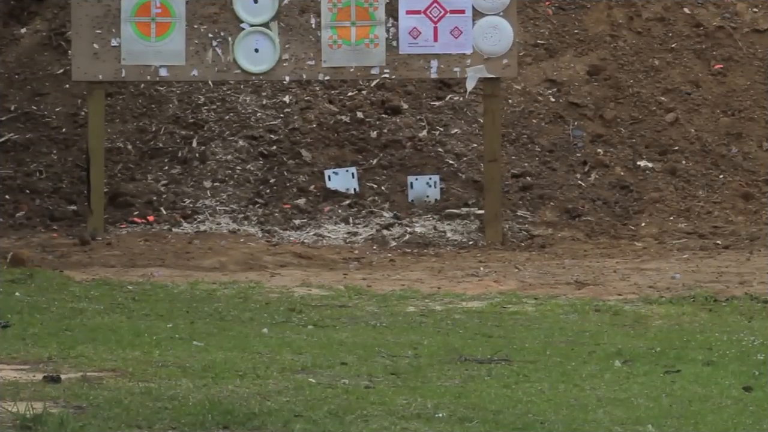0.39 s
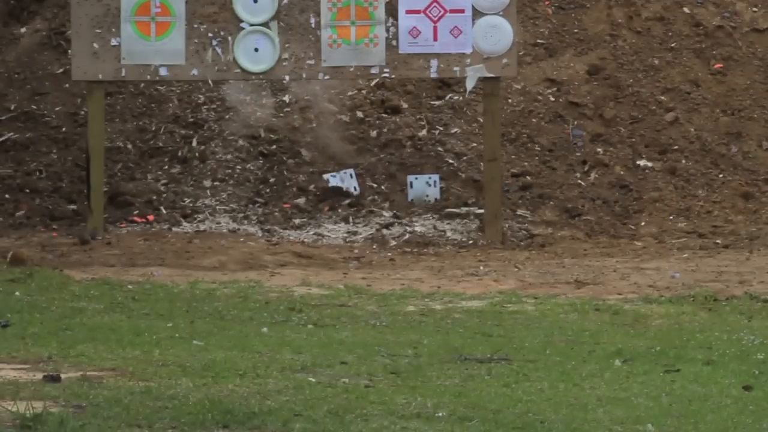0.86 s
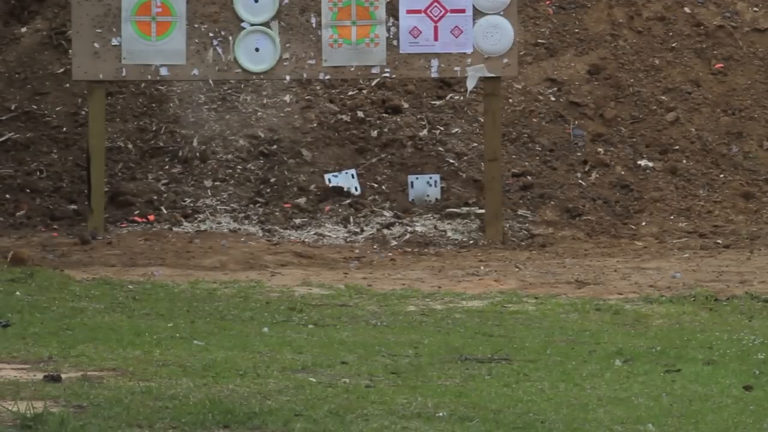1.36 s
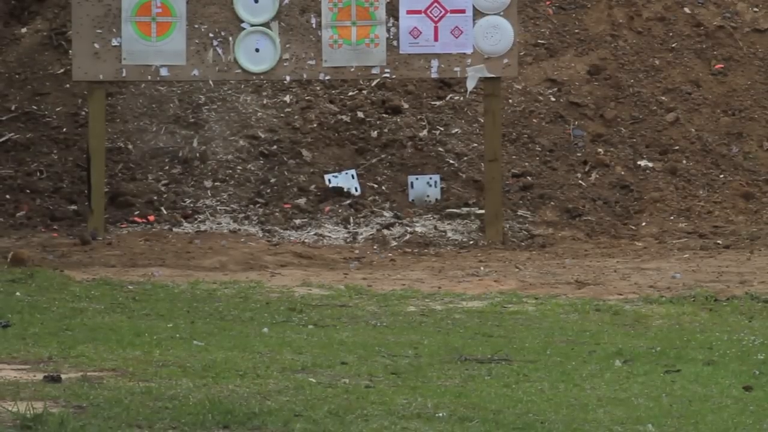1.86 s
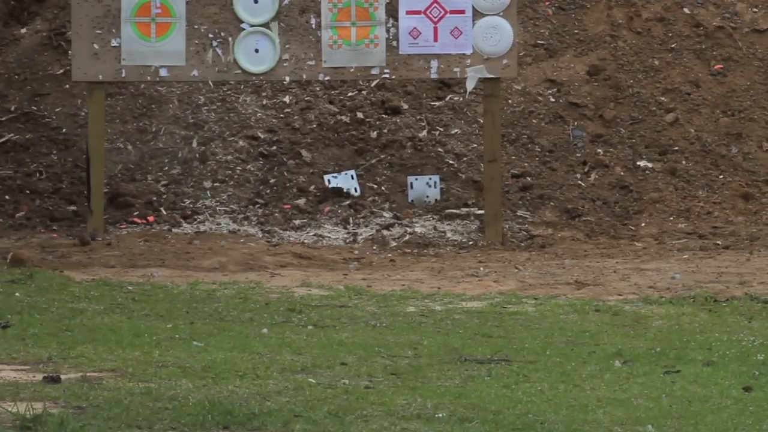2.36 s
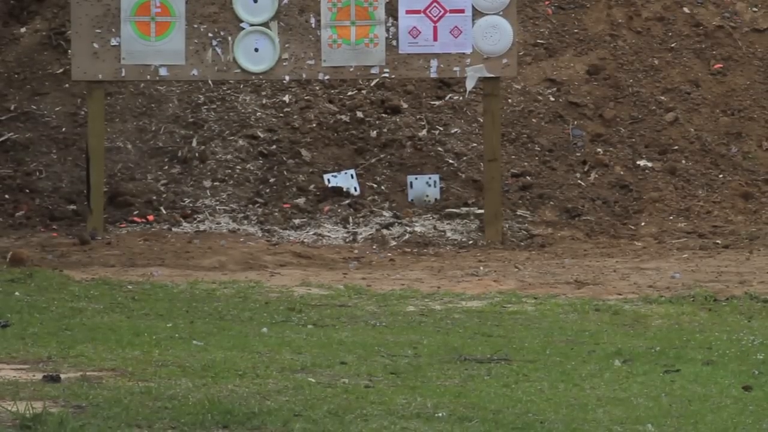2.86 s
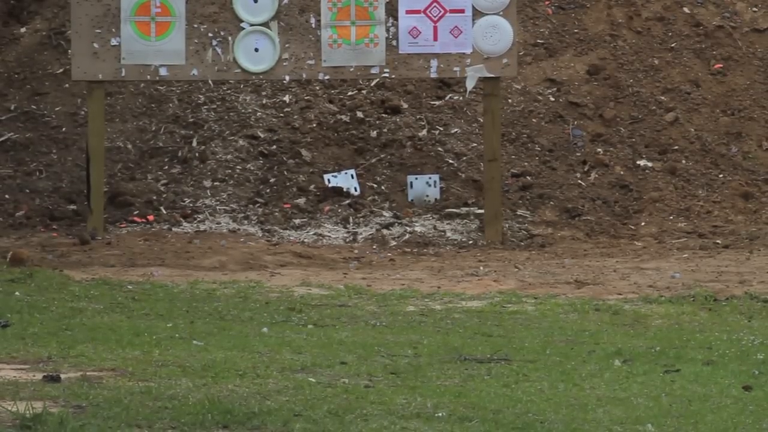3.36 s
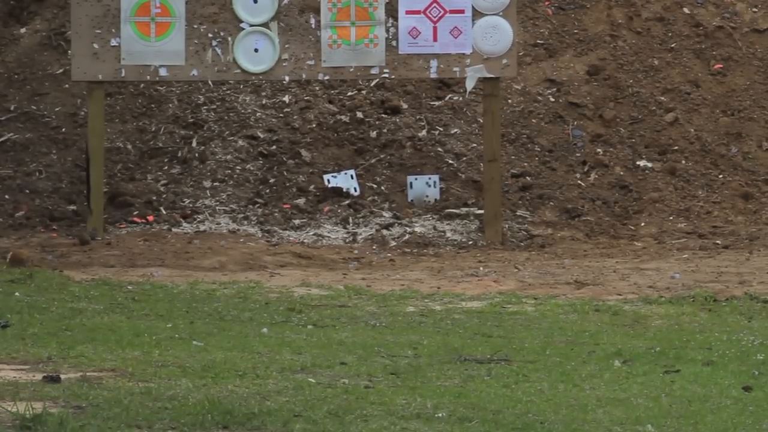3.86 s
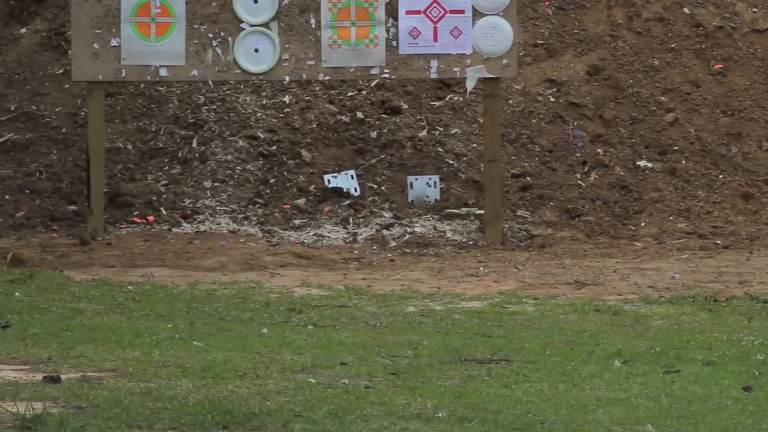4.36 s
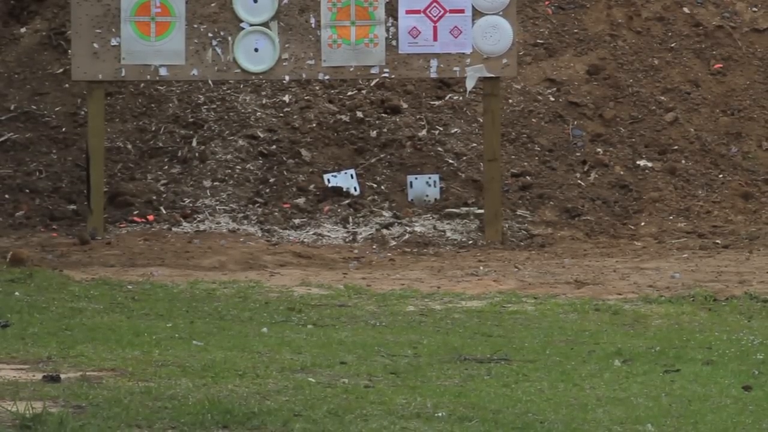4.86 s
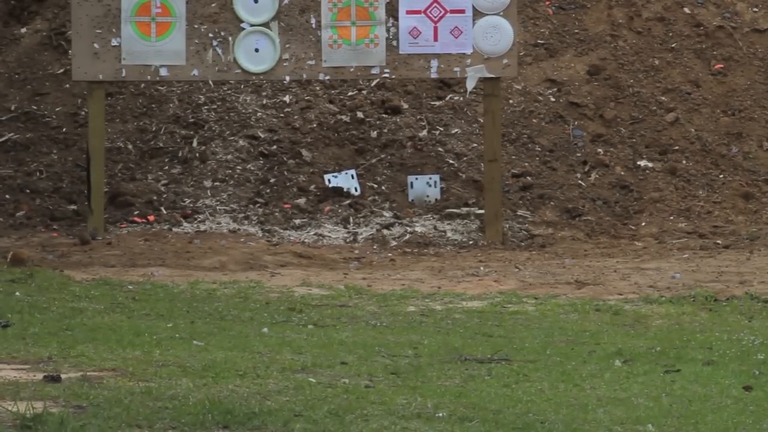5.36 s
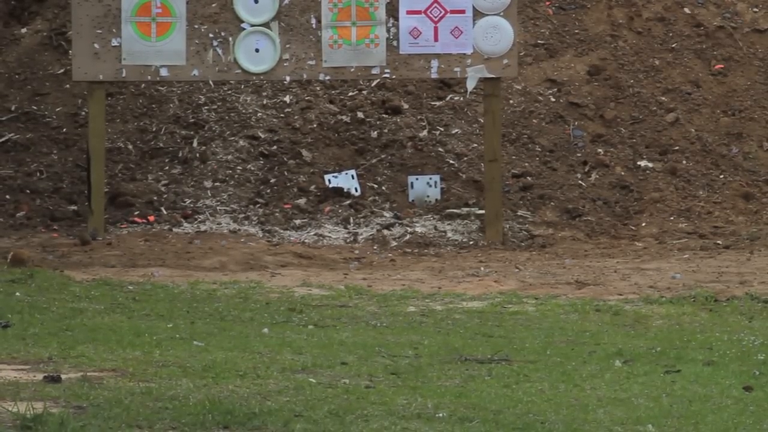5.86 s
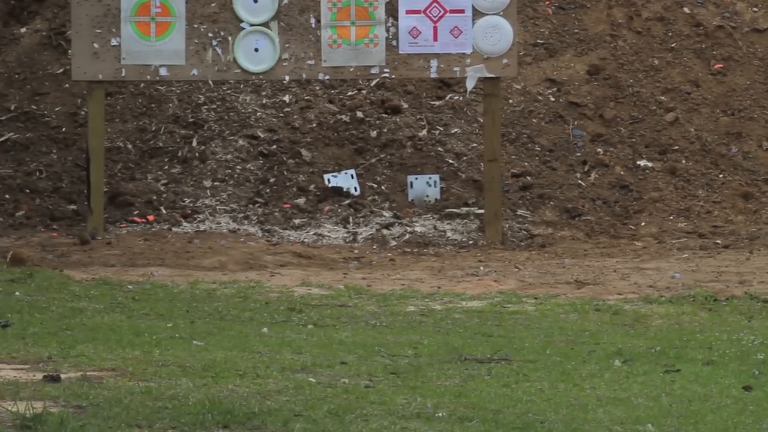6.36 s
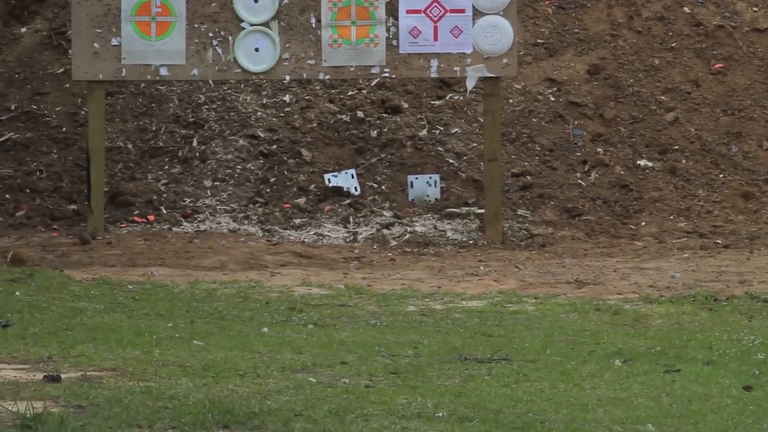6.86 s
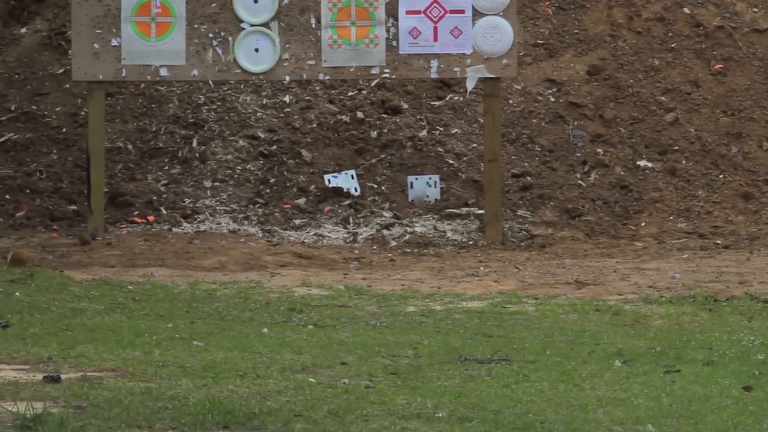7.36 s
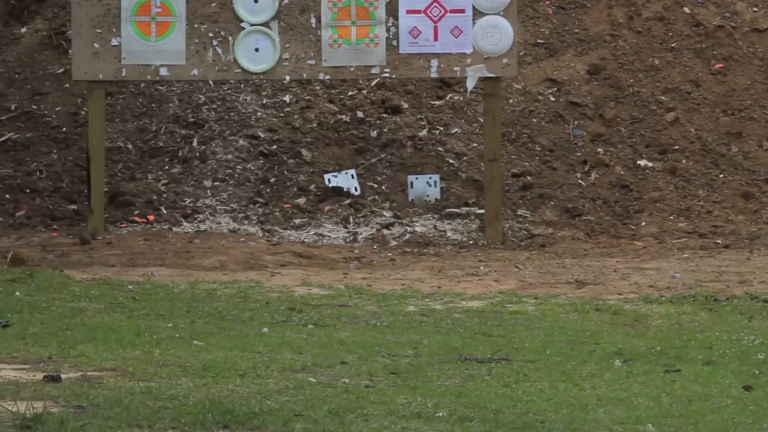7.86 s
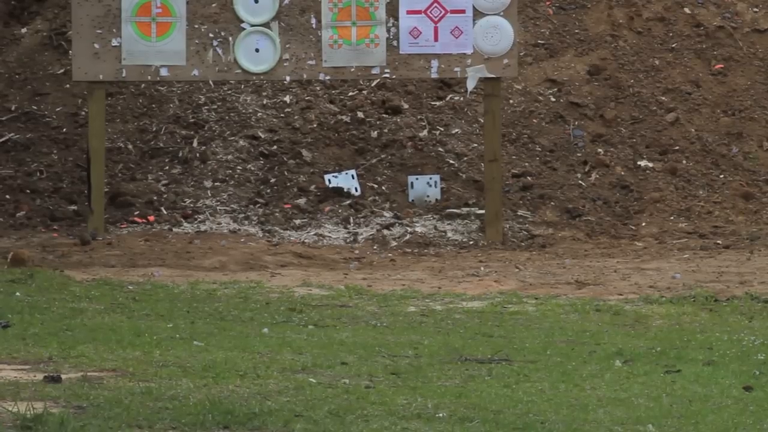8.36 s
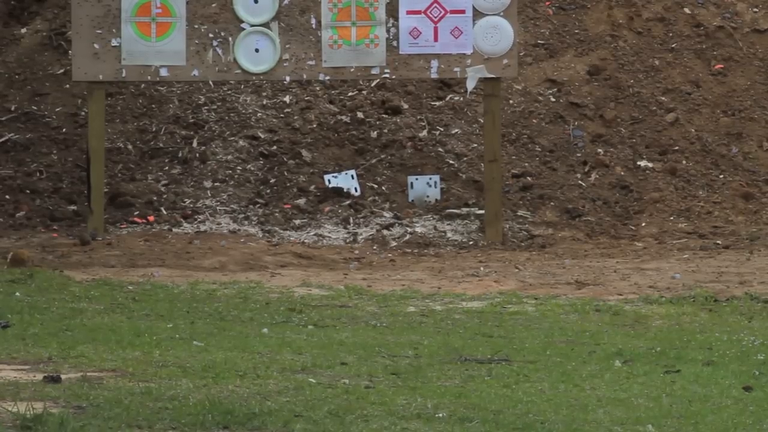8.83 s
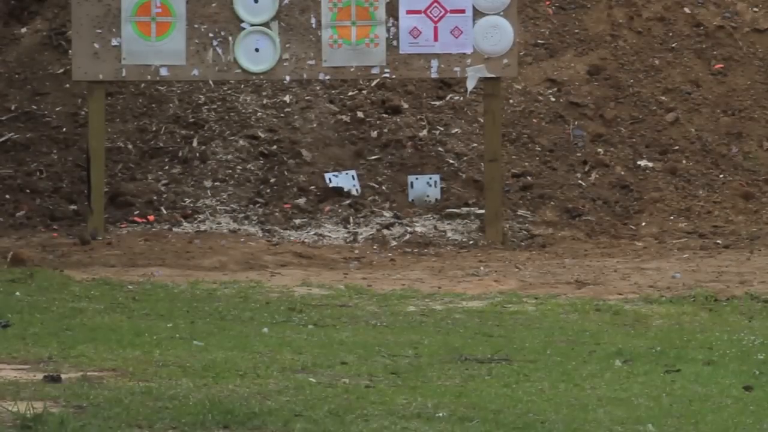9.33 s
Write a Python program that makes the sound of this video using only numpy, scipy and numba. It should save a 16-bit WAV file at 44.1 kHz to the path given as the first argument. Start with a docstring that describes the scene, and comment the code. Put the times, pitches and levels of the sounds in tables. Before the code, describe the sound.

Eight loud gunshots at an outdoor range, six sharp and two heavy, with slapping echoes, rattling steel bolt and brass cases tinkling on concrete.

```python
"""Outdoor range, covered firing line: a light carbine fires six times, a heavy rifle twice, close to a camera.
Each blast is a few steep pressure waves, banded noise decaying under the roof, then slaps and washes between far banks.
A steel bolt rattles and knocks, brass cases ring on concrete, over a hush, a fading rumble and wavering hums.
The microphone input overloads and a gain control ducks the background after every shot."""
import sys
import numpy as np
from scipy import signal
from scipy.fft import rfft, irfft, next_fast_len
from scipy.io import wavfile
from scipy.ndimage import uniform_filter1d, minimum_filter1d
from numba import njit

SR = 44100
rng = np.random.default_rng(int(sys.argv[2]) if len(sys.argv) > 2 else 0)


def pcm_store(signal):
    """Save signal as 16-bit PCM."""
    levels = np.round(np.clip(np.atleast_2d(signal), -1, 1) * 32767)
    wavfile.write(sys.argv[1], SR, levels.astype(np.int16).T)


def ratio_of_db(decibels):
    """Turn decibels (scalar or array-like) into linear amplitude factors; 0 dB maps to 1."""
    return 10 ** (np.asarray(decibels, float) / 20)


N = 417627


def evened(x):
    """Scales to rms 1."""
    return x / np.sqrt(np.mean(x ** 2) + 1e-20)


def read(points, hz):
    """All columns of a table at the frequencies hz, interpolated on a log axis."""
    f, *columns = np.transpose(points)
    return [np.interp(np.log(hz + 1), np.log(f + 1), c) for c in columns]


def add(mix, start_s, sound):
    """Adds a sound in place, cut at the end of the mix."""
    part = mix[round(start_s * SR):][:len(sound)]
    part += sound[:len(part)]


def coloured(size, points, tilt_db_per_octave=0):
    """Noise of rms 1 with a spectrum, tilted about 3 kHz."""
    hz = np.fft.rfftfreq(size, 1 / SR)
    spectrum_db = read(points, hz)[0] + tilt_db_per_octave * np.log2((hz + 1) / 3000)
    return evened(irfft(rfft(rng.standard_normal(size)) * ratio_of_db(spectrum_db), size))


def dying(t, db, t60, rise):
    """Power of a sound that starts at t = 0, swells and decays."""
    t = np.maximum(t, 0)
    return (ratio_of_db(db - 60 * t / t60) * (1 - np.exp(-t / rise))) ** 2


# band centres [Hz]
BANDS = np.geomspace(50, 16000, 16)


def banded(size):
    """White noise split in overlapping bands, each of rms 1."""
    log_hz = np.log(np.fft.rfftfreq(size, 1 / SR) + 1)
    place = np.interp(log_hz, np.log(BANDS), np.arange(len(BANDS)))
    share = np.clip(1 - abs(place - np.arange(len(BANDS))[:, None]), 0, 1)
    bands = irfft(rfft(rng.standard_normal(size)) * share, size)
    return bands / bands.std(1, keepdims=True)


def blast_wave(delay_free_t, length_s):
    """Steep pressure wave, roughened by turbulent gas."""
    u = delay_free_t / length_s
    turbulence = uniform_filter1d(rng.standard_normal(len(u)), size=5)
    crackle = 1 + 1.2 * np.exp(-1.3 * u) * turbulence
    return -(1 - u) * np.exp(-u) * crackle


# return from banks and trees:
# (frequency [Hz], slap level [dB], wash level [dB], t60 of one wash [s], long tail level [dB], its t60 [s])
FAR = [(60, -25, -11, 1, -57.5, 1.6), (302, -45, -35.5, 0.95, -34, 1.14), (790, -36, -20, 0.87, -31, 1.31),
       (1830, -3, -1.5, 0.68, -45, 2.61), (2640, -16, -0.5, 0.16, -20.5, 1.23),
       (4480, -2, -5, 0.47, -43.5, 2.01), (7100, -21, 2.5, 0.17, -30, 1.115),
       (10700, -5.5, -5.5, 0.34, -42.5, 0.52), (15300, -33, -12, 0.36, -49, .8)]
AGAIN_FROM_S, AGAIN_S, AGAIN_DB = .5, .2405, -6.5  # distant returns cross once more between two banks
SLAP_S, SMEAR_S_PER_S = 0.0011, 0.0012  # slap time scale, its growth with path time
WASH_RISE_S = 0.0072
DULL_DB_PER_S, DULL_MOST_DB, WASH_DULL_LEAST_DB = 72.5, 32.5, 2  # loss at 10 kHz, grows with path time


def far_returns(t, echoes, tail_db, tail_tilt_db, clear_s):
    """Band powers of washes with long tail, and of slaps; treble loss grows with the path beyond clear_s."""
    hz = BANDS[:, None]
    slap_colour_db, wash_colour_db, wash_t60, long_db, long_t60 = read(FAR, hz)
    far = dying(t, long_db + tail_db + tail_tilt_db * np.log2(hz / 2000), long_t60, .05)
    slaps = np.zeros_like(far)
    again = [(delay + AGAIN_S, slap_db + AGAIN_DB, wash_db + AGAIN_DB)
             for delay, slap_db, wash_db in echoes if delay > AGAIN_FROM_S]
    for delay, slap_db, wash_db in echoes + again:
        dull_db = min(DULL_DB_PER_S * (delay - clear_s), DULL_MOST_DB)
        start = round(delay * SR)
        span = slice(start, start + 20000)
        after = t[span] - delay
        wash_loss_db = max(dull_db, WASH_DULL_LEAST_DB) * hz / 10000
        far[:, span] += dying(after, wash_db + wash_colour_db - wash_loss_db, wash_t60, WASH_RISE_S)
        # the crack returns as a short burst
        burst = np.exp(-(after / (SLAP_S + SMEAR_S_PER_S * delay) - 1) ** 4 * 2)
        slaps[:, span] += ratio_of_db(2 * (slap_db + slap_colour_db - dull_db * hz / 10000)) * burst
    # reflectors thin out with distance
    scatter = evened(uniform_filter1d(rng.standard_normal(len(t)), 160))
    far *= ratio_of_db(np.clip(9 * t, 2, 5) * scatter)
    return far, slaps


# noise common to all shots of a gun: (time after shot [s], share [0..1])
LIKENESS = [(0, 1), (.05, 1), (.2, 0.54), (1.6, 1)]
SLAP_LOSS_DB_PER_S = 1200  # per s of lag: the further the muzzle turns away, the weaker the slap


def gun(shots, blast, near, echoes, tail_db, tail_tilt_db, knee_s, fall_db_per_s, clear_s):
    """Blast waves, roof reverberation and echoes; the place answers each shot nearly alike."""
    t = np.arange(70000) / SR
    close = dying(t, *read(near, BANDS[:, None]))
    close = close / ratio_of_db(2 * fall_db_per_s * np.maximum(t - knee_s, 0))  # decay bends at the knee
    far, slaps = far_returns(t, echoes, tail_db, tail_tilt_db, clear_s)
    place = banded(len(t))
    same = np.clip(np.interp(t, *np.transpose(LIKENESS)), 0, 1)
    out = np.zeros(N)
    for start_s, blast_db, echo_db, lag_s in shots:
        turned_slaps = slaps / ratio_of_db(2 * SLAP_LOSS_DB_PER_S * lag_s)
        late = ratio_of_db(2 * echo_db) * np.roll(far + turned_slaps, round(lag_s * SR), axis=1)
        noise = same * place + np.sqrt(1 - same ** 2) * banded(len(t))
        shot = (noise * np.sqrt(close + late)).sum(0)
        for delay_s, wave_db, length_s in blast:
            add(shot, delay_s, ratio_of_db(wave_db) * blast_wave(t[:1000], length_s))
        add(out, start_s, ratio_of_db(blast_db) * shot)
    return out


# (time [s], gain of the whole shot [dB], further echo gain [dB], echo lag as the muzzle turns away [s])
CARBINE_SHOTS = [(0.8358, 2.5, -4.5, 0.002), (2.3853, 0.5, 0.3, 0.0028), (3.6940, 1, 0.7, 0.0011),
                 (5.4004, 2, 0.5, 0.0001), (6.7903, 1, 0, 0.002), (8.1234, 0.5, -0.1, 0.003)]
# pressure wave, bounces off bench and ground: (delay [s], level [dB], length [s])
CARBINE_BLAST = [(0, 19, .00028), (.0005, 24, .0004), (.0021, 13, .0008), (.0036, 18, .0005),
                 (.0049, 12, .00015), (.0058, 10, .0005)]
# reverberation under the roof: (frequency [Hz], level [dB], t60 [s], rise [s])
CARBINE_NEAR = [(59.7, -40, 0.7, .01), (185, -16, 0.42, 0.0069), (480, -14.5, 0.5, 0.0021),
                (845, -16, 0.38, 0.0019), (1544, -12.5, 0.53, 0.0025), (2260, -7.5, 0.49, 0.0015),
                (4570, -10, 0.55, 0.0017), (6960, -10.5, 0.39, 0.0025), (11000, -9.5, 0.43, 0.0055),
                (15500, -12.5, .4, .001)]
# reflectors: (delay [s], slap level [dB], wash level [dB])
CARBINE_ECHOES = [(0.23, -58, -22), (.258, -8.5, -37), (0.513, -18, -37), (0.551, -22.5, -41),
                  (0.675, -29, -47.5), (.704, -35, -48.5), (0.9647, -37.5, -54)]


def carbine():
    """Light gun: several close wave bounces; roof decay slows past the knee."""
    return gun(CARBINE_SHOTS, CARBINE_BLAST, CARBINE_NEAR, CARBINE_ECHOES,
               tail_db=0.0, tail_tilt_db=2.5, knee_s=0.24, fall_db_per_s=-7, clear_s=0.33)


# (time [s], gain of the whole shot [dB], further echo gain [dB], echo lag [s])
RIFLE_SHOTS = [(0.5408, 0.077, .1, .0001), (8.9609, 0.11, 0.14, .0001)]
# pressure wave and bounce: (delay [s], level [dB], length [s])
RIFLE_BLAST = [(0, 26.8, 0.00034), (.0032, 8.9, 0.00033)]
# reverberation under the roof: (frequency [Hz], level [dB], t60 [s], rise [s])
RIFLE_NEAR = [(62, -10.5, 0.93, 0.074), (128, 10.5, 0.63, 0.038), (215, 12.5, 0.51, 0.041),
              (450, 18, 0.58, 0.1), (885, 14.5, 0.63, 0.03), (1620, 8, 0.63, .003),
              (2228, 10.5, 0.66, 0.0039), (4400, 2.5, 0.88, 0.0056), (7000, -0.5, 0.78, 0.00077),
              (11220, -3.5, 0.63, 0.00055), (15500, -9.5, .4, .001)]
# reflectors: (delay [s], slap level [dB], wash level [dB])
RIFLE_ECHOES = [(0.181, 3, -12.5), (0.4364, -10, -18)]


def rifle():
    """Heavy gun: strong low reverberation; past the roof's end it dies faster."""
    return gun(RIFLE_SHOTS, RIFLE_BLAST, RIFLE_NEAR, RIFLE_ECHOES,
               tail_db=9.0, tail_tilt_db=-6.5, knee_s=0.084, fall_db_per_s=16, clear_s=0.19)


# spectrum off a distant slope: (frequency [Hz], density [dB per Hz])
SLOPE_COLOUR = [(59, -44), (100, -12), (290, -3.5), (546, -9), (641, -2.5), (807, -12), (2500, -49.5),
                (3250, -64), (5500, -120)]


def slope_echo():
    """One low, smeared return of the rifle: dull noise, fast rise, exponential decay."""
    out = np.zeros(N)
    power = dying(np.arange(20000) / SR, db=-24.5, t60=0.54, rise=.01)
    add(out, 1.931, coloured(20000, SLOPE_COLOUR) * np.sqrt(power))
    return out


# bolt and handling: (time [s], level [dB], brightness [dB per octave], ring level relative to it [dB],
# frequency near which the struck part rings [Hz])
CLACKS = [(1.922, -32, -2.5, -14, 4300), (1.985, -30, -2, -12, 4320), (2.212, -29.5, -2, -20.5, 4580),
          (2.358, -15.5, 0.5, -28, 9000), (2.362, -20, 3, -19, 9160), (2.998, -39.5, 4, -2, 8000),
          (3.07, -27, 1.2, -20, 10800), (3.095, -18.5, -2.5, -34, 3400), (3.0997, -10.5, 1.5, -26, 10800),
          (3.134, -27, -17, -13, 3400), (3.402, -36.5, -2.5, -17, 9000), (3.41, -21, 3, -17, 9000),
          (3.422, -14.5, -0.6, -14.5, 1894), (3.46, -36, 1.5, -12.5, 1800), (8.061, -34, 4.5, -19.5, 9100)]
# steel modes: (frequency [Hz], level [dB], t60 [s])
STEEL = [(1010, -4, .25), (1800, 2, .3), (3450, 2, .3), (3960, 0, .3), (4620, -2, .3), (6900, 0, .15),
         (8820, -2, .07), (10850, 0, .25), (11200, -2, .13)]
# clatter spectrum: (frequency [Hz], density [dB per Hz])
CLACK_COLOUR = [(180, -41), (300, -16.5), (1300, -5.5), (1970, -3), (2280, -1.5), (2570, -8.5), (3520, -4),
                (10700, -10), (16000, -19.5)]
SCRAPE_RISE_S, SCRAPE_DB, SHARPEN_DB_PER_DB = 0.0043, -32, .9  # knocks louder than a scrape start faster


def bolt():
    """Steel scrapes and knocks: an uneven rattle rings modes near the part hit, then the roof reverberates."""
    t = np.arange(20000) / SR
    out = np.zeros(N)
    for start_s, db, tilt_db, ring_db, part_hz in CLACKS:
        rise = SCRAPE_RISE_S / ratio_of_db(SHARPEN_DB_PER_DB * max(db - SCRAPE_DB, 0))
        modes = np.zeros(len(t))
        for hz, level_db, t60 in STEEL:
            off_part_db = 9 * abs(np.log2(hz / part_hz))
            modes += ratio_of_db(level_db - off_part_db - 60 * t / t60) * np.sin(2 * np.pi * hz * t)
        rattle = rng.standard_normal(4000) ** 3 * np.sqrt(dying(t[:4000], 0, .25, .001))  # cubed: spiky
        ring = signal.fftconvolve(rattle, modes)[:len(t)]
        uneven = ratio_of_db(11.0 * evened(uniform_filter1d(rng.standard_normal(len(t)), 25)))
        direct_power = uneven * dying(t, -12.0, 0.081, rise)
        roof_power = dying(t, -13.0, 0.46, rise + 0.0032)
        clatter = coloured(len(t), CLACK_COLOUR, tilt_db) * np.sqrt(direct_power + roof_power)
        add(out, start_s, ratio_of_db(db) * (clatter + ratio_of_db(ring_db) * ring / abs(ring).max()))
    return out


def cases(bounces, brass, tick_db, twin_db):
    """Thin brass tube hits concrete: faint tick and split pairs of modes, unsteady as it tumbles."""
    t = np.arange(20000) / SR
    out = np.zeros(N)
    for start_s, db, low_db in bounces:
        ring = np.zeros(len(t))
        for (hz, twin_hz, t60), level_db in zip(brass, (0, low_db)):
            pair = np.sin(2 * np.pi * hz * t) + ratio_of_db(twin_db) * np.sin(2 * np.pi * twin_hz * t)
            ring += ratio_of_db(level_db - 60 * t / t60) * pair
        tumble = ratio_of_db(3.5 * evened(uniform_filter1d(rng.standard_normal(len(t)), 120)))
        onset = 1 - np.exp(-t / 0.00093)
        tick = np.diff(rng.standard_normal(len(t) + 1)) * np.sqrt(dying(t, tick_db, 0.13, .002))
        add(out, start_s, ratio_of_db(db - 7.5) * (ring * tumble * onset + tick))
    return out


# bounces: (time [s], level before a common 7.5 dB cut [dB], low pair relative to high pair [dB])
SMALL_CASES = [(.057, -59, 1), (.1825, -58, -10), (1.291, -51, -8), (1.5464, -48, -15), (1.925, -65, -8),
               (2.168, -60, -8), (2.8, -46, -3), (3.568, -61, -11), (4.2767, -42, -1), (4.73, -58, -8),
               (4.9377, -58.5, -12), (5.918, -48, -7), (6.13, -51, -8), (6.5124, -53, -4),
               (6.712, -54.5, 2), (7.3886, -44, -8), (7.8595, -51, -4), (8.748, -46, 2)]
# high and low pair of modes: (frequency [Hz], twin frequency [Hz], t60 [s])
SMALL_BRASS = [(12500, 12630, .3), (5480, 5710, .18)]


def small_cases():
    """Small brass: mode pairs an octave or so apart, clear tick."""
    return cases(SMALL_CASES, SMALL_BRASS, tick_db=-1.5, twin_db=2.0)


# bounces: (time [s], level before a common 7.5 dB cut [dB], low pair relative to high pair [dB])
LARGE_CASES = [(2.61, -32, 0.1), (3.2271, -46, 0.1), (4.1565, -44, 0.1)]
# high and low pair of modes: (frequency [Hz], twin frequency [Hz], t60 [s])
LARGE_BRASS = [(14720, 14790, .45), (10490, 10530, .7)]


def large_cases():
    """Large brass: longer ring of closer mode pairs, weak tick."""
    return cases(LARGE_CASES, LARGE_BRASS, tick_db=-14, twin_db=3.5)


# steady outdoor hush: (frequency [Hz], density [dB per Hz])
AIR = [(15, -48.5), (25, -13.5), (118, 3), (203, 2), (386, -12.5), (954, -2.5), (1060, -7.5), (1480, -2.5),
       (4860, -29), (5670, -22), (7160, -41.5), (10000, -20), (12000, -39.5), (15600, -63.5), (22000, -120)]
AIR_DB = -54.5
# distant engine-like rumble: (frequency [Hz], density [dB per Hz])
RUMBLE = [(35, -35), (60, -10.5), (103, -7), (196, -3.5), (323, -14.5), (523, -18), (606, -22), (771, -15),
          (1140, -16), (1650, -28), (1810, -17.5), (2870, -27), (5000, -33), (6500, -66.5), (11000, -120)]
RUMBLE_DB, RUMBLE_HOLD_S, RUMBLE_FADE_DB_PER_S = -46.5, 2, 4  # steady, then moving off
# (frequency [Hz], width [Hz], level [dB], share of the rumble's dB level added to it [0..1])
HUMS = [(122, 14, -62, 0.023), (707.4, 20, -14, 1), (1130, 14, -19.5, 0.97)]


def background():
    """Shaped noise as hush and fading rumble; narrow noise bands as wavering hums."""
    size = next_fast_len(N)
    fading_s = np.maximum(np.arange(N) / SR - RUMBLE_HOLD_S, 0)
    rumble_db = RUMBLE_DB - RUMBLE_FADE_DB_PER_S * fading_s
    out = ratio_of_db(AIR_DB) * coloured(size, AIR)[:N]
    out += ratio_of_db(rumble_db) * coloured(size, RUMBLE)[:N]
    for hz, width_hz, db, follows in HUMS:
        narrow = 1 / (1 + (2 * (np.fft.rfftfreq(size, 1 / SR) - hz) / width_hz) ** 2)
        hum = evened(irfft(rfft(rng.standard_normal(size)) * narrow, size))[:N]
        out += ratio_of_db(db + follows * rumble_db) * hum
    return out


# low amplifier noise: (frequency [Hz], density [dB per Hz])
FLUTTER = [(15, -10.5), (30, -8.5), (60, 1), (100, -2), (200, -33.5)]
FLUTTER_DB = -65.5
WHINE_HZ, WHINE_DB = 15700, -60.5


def electronics():
    """The camera's own low amplifier noise and thin sine whine."""
    whine = ratio_of_db(WHINE_DB) * np.sin(2 * np.pi * WHINE_HZ * np.arange(N) / SR)
    return whine + ratio_of_db(FLUTTER_DB) * coloured(next_fast_len(N), FLUTTER)[:N]


def scene():
    """Sum of all sources, one channel."""
    guns = carbine() + rifle() + slope_echo()
    metal = bolt() + small_cases() + large_cases()
    return (guns + metal + background())[None]


@njit
def duck(over_db, attack, hold, release, creep, share):
    """Gain cut [dB]: falls fast, holds, recovers; a slow memory keeps gain lower through a string of shots."""
    out, now, slow, wait = np.zeros(len(over_db)), 0., 0., 0.
    for i in range(len(over_db)):
        wait -= 1
        if over_db[i] > now:
            now += attack * (over_db[i] - now)
            wait = hold
        elif wait < 0:
            now -= release * now
        slow += creep * (now - slow)
        out[i] = now + share * slow
    return out


def sagged(x, time_constant_s):
    """A coupling capacitor lets flat tops droop: first-order high-pass."""
    r = np.exp(-1 / (time_constant_s * SR))
    return signal.lfilter([r, -r], [1, -r], x)


def band_limit(x):
    """A steep low-pass at the top of the band."""
    return signal.sosfilt(signal.butter(12, 17000, fs=SR, output="sos"), x)


def record(dry):
    """Microphone stage overloads and droops; gain control ducks; converter clips; low-pass limits the band."""
    low_cut = signal.cheby1(4, 1, 114, "high", fs=SR, output="sos")  # the capsule passes no deep bass
    overloaded = np.clip(signal.sosfilt(low_cut, dry[0]), -1.1, 1.1)
    drooped = sagged(sagged(overloaded, 0.0012), 0.0057) + electronics()
    peak = -minimum_filter1d(-abs(drooped), size=90, origin=44)  # over the past 2 ms
    over_db = np.maximum(20 * np.log10(peak + 1e-6) + 9.0, 0)  # threshold -9 dB
    cut_db = duck(over_db, attack=1 / (0.0028 * SR), hold=.38 * SR, release=1 / (.4 * SR),
                  creep=1 / (4. * SR), share=0.074)
    ducked = drooped / ratio_of_db(cut_db)
    ducked = ducked * ratio_of_db(13 * (np.arange(N) < .041 * SR))  # the first 41 ms are 13 dB louder
    converted = np.clip(ducked, -.73, .73)
    limited = signal.oaconvolve(converted, signal.firwin(255, 15900, fs=SR), "same")
    return band_limit(limited[None])


dry = scene()
out = record(dry)
pcm_store(out)
```